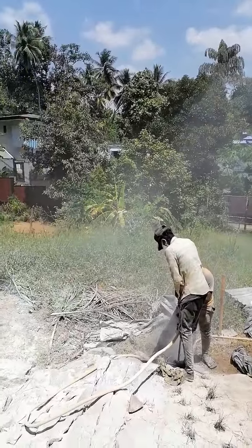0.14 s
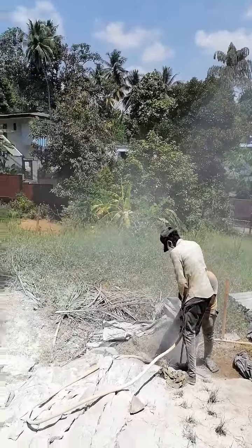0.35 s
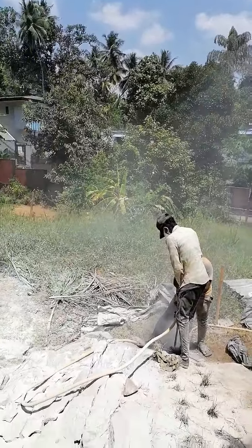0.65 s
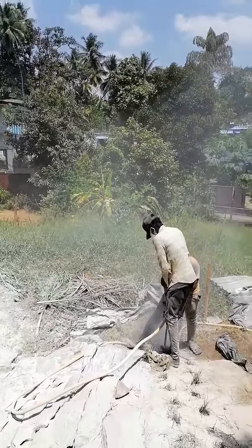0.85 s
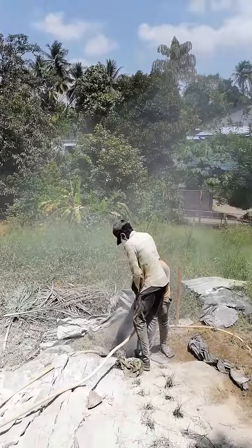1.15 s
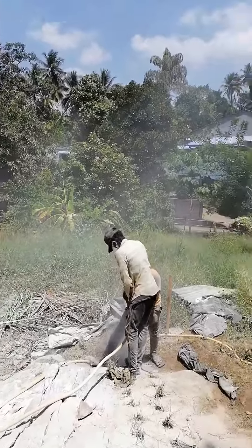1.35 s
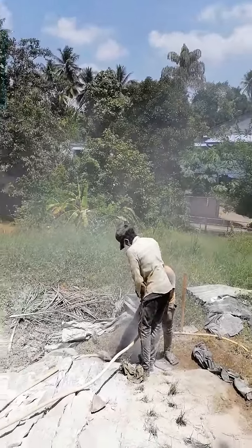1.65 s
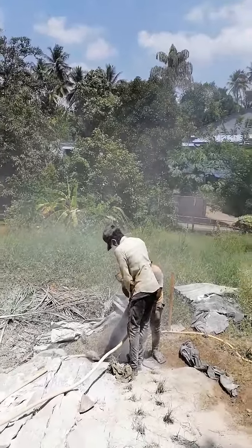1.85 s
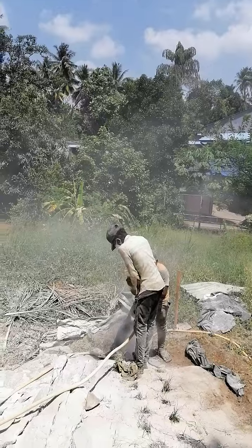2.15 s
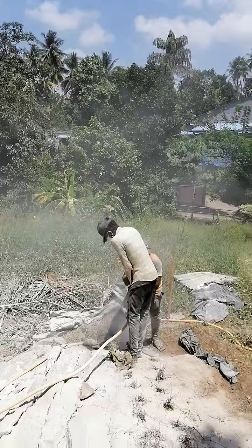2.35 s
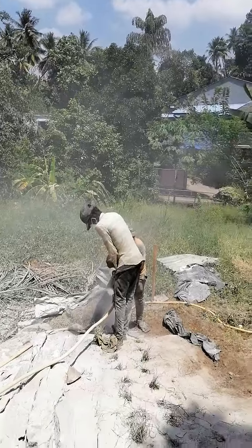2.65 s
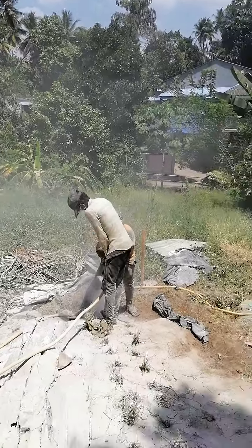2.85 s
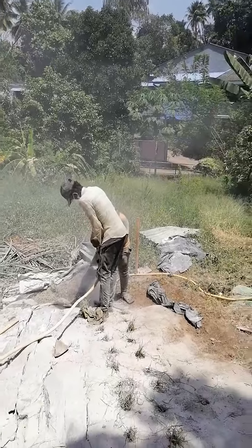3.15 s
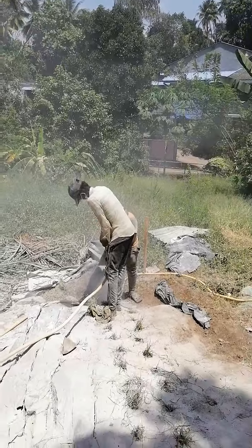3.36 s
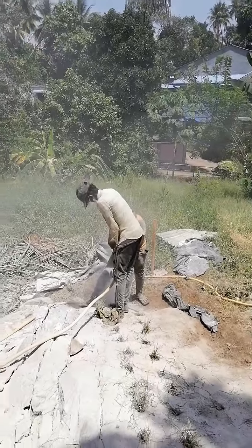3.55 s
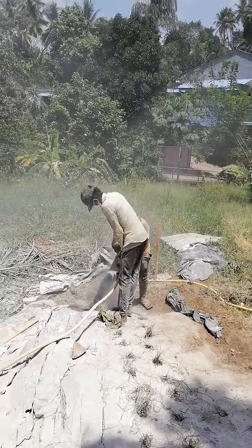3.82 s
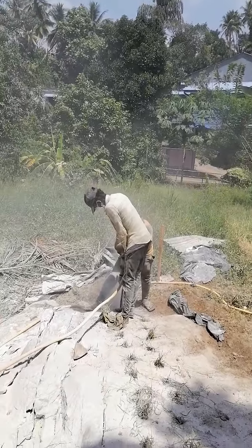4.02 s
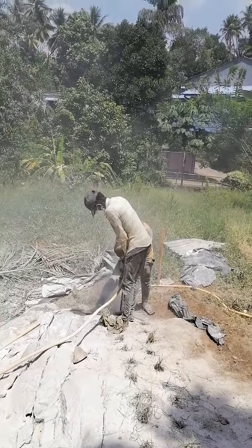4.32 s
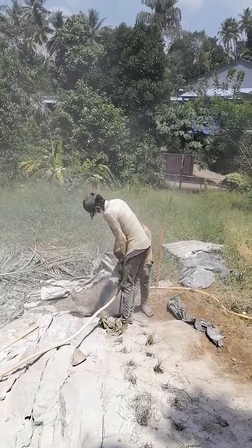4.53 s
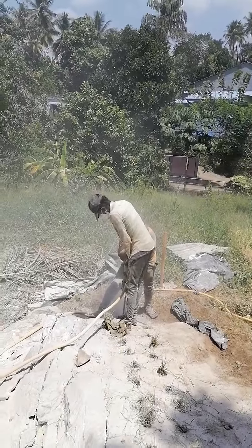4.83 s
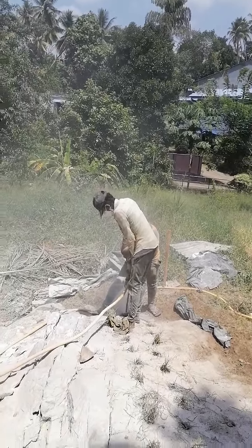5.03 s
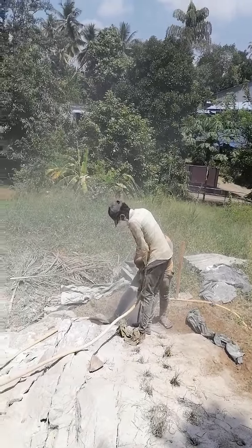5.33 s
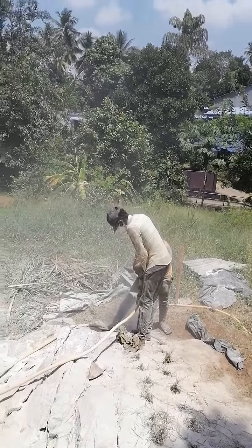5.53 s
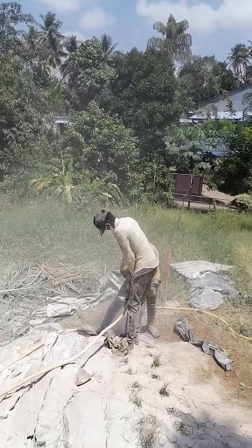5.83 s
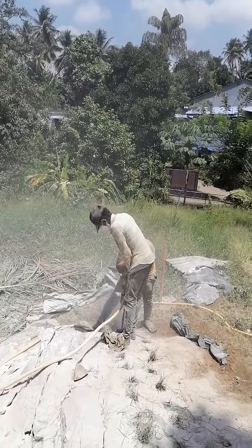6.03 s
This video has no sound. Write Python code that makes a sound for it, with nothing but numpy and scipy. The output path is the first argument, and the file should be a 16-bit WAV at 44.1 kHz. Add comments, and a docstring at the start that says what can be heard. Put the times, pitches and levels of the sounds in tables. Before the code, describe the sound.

A hand-held pneumatic rock drill is at full work from 0 seconds, a few metres from a stereo microphone outdoors. Its piston barks roughly thirty-five times per second, fusing into a coarse, throaty buzz with a low boom. Compressed air hisses constantly, spitting and surging within each cycle. Just after every bark, the blow makes the casing clatter and the drill steel chatter brightly in its hole, with uneven harder and softer hits. The hammering slows momentarily near 1.5, 2.2 and 2.7 seconds as the bit bites, recovering quickly each time. Between about 2 and 3 seconds the exhaust hum fades as the microphone turns, leaving a drier, rattlier tone. From 3 seconds the drill runs slightly faster and steadily, its metallic colour wavering. The sound leans right, with a very short scattered echo, and continues unbroken until just past 6 seconds.

```python
"""A hand-held pneumatic rock drill bores into bare rock a few metres away, outdoors.
From the start each piston cycle barks air from the exhaust: filtered pressure impulses trailed by jet noise.
Spent air hisses throughout; just after each bark a blow excites rod modes and bursts of contact noise.
The hammering slows briefly near 1.5, 2.2 and 2.7 s as the bit bites, then runs on faster.
From about 2 to 3 s the exhaust's hum fades as the stereo microphone turns; the drilling lasts to the end."""
import sys
import numpy as np
from scipy import signal
from scipy.fft import rfft, irfft, next_fast_len
from scipy.io import wavfile

SR = 44100
rng = np.random.default_rng(int(sys.argv[2]) if len(sys.argv) > 2 else 0)


def unload_wav(signal):
    """Save mono or channel-first audio to the path in sys.argv[1] as 16-bit WAV at rate SR, clipped to [-1, 1]."""
    wavfile.write(
        sys.argv[1],
        SR,
        np.round(np.clip(np.atleast_2d(signal).T, -1, 1) * 32767).astype(np.int16),
    )


N = 272538


def amp(db):
    """Level to amplitude ratio: 20 dB is a factor of ten."""
    return 10 ** (np.asarray(db) / 20)


def unit(x):
    """Normalization of signal power: scale to rms 1."""
    return x / np.sqrt(np.mean(x ** 2) + 1e-20)


def along(points, hz):
    """Interpolation of (f/Hz, value) points on a logarithmic frequency axis."""
    f, value = np.transpose(points)
    return np.interp(np.log(hz + 1), np.log(f + 1), value)


def curves(rows):
    """Linear interpolation in time: one value per sample for each column after t/s."""
    s, *columns = np.transpose(rows)
    return [np.interp(np.arange(N) / SR, s, column) for column in columns]


def wobble(rate):
    """Low-frequency random modulation: normal random knots, rate per second, joined by lines."""
    knots = rng.standard_normal(int(N * rate / SR) + 2)
    return np.interp(np.arange(N) * rate / SR, np.arange(len(knots)), knots)


def filtered(x, response):
    """Convolution theorem: the spectrum of x times a complex response of frequency."""
    size = 2 * next_fast_len(N // 2 + SR // 4)
    hz = np.fft.rfftfreq(size, 1 / SR)
    return irfft(rfft(x, size) * response(hz), size)[..., :N]


def causal(gain):
    """Minimum phase: folding the cepstrum gives a response that rings only after its cause."""
    cepstrum = irfft(np.log(gain))
    half = len(cepstrum) // 2
    cepstrum[1:half] *= 2
    cepstrum[half + 1:] = 0
    return np.exp(rfft(cepstrum))


def strokes(times, scatter_db, jitter, strength_db=0):
    """Impulse train: one impulse per stroke, with random size (dB) and timing (s)."""
    size, slip = rng.standard_normal((len(times), 2)).T
    at = np.round((times + jitter * slip) * SR).astype(int)
    inside = (at >= 0) & (at < N)
    strength = amp(strength_db + scatter_db * size)
    return np.bincount(at[inside], strength[inside], N)


def bursts(hits, rise, hold, fade, held):
    """Power superposition: each hit swells, holds and decays (s); held is steady power against their mean."""
    t = np.arange(SR // 10) / SR
    shape = (1 - np.exp(-t / rise)) * np.exp(-np.maximum(t - hold, 0) / fade)
    power = np.abs(signal.oaconvolve(hits ** 2, shape ** 2)[:N])
    return unit(np.sqrt(power / power.mean() + held))


# level difference between the two ports: f/Hz, left minus right level/dB
PORT_LEVEL_DIFFERENCE = [(60, -5), (130, -7), (260, -11), (420, -6), (700, -6.5), (1150, -3.5), (1450, 2.5),
                         (1750, -3), (2000, -1), (2900, -10), (4000, -3), (5000, -8), (6200, -7.5),
                         (7300, -2.5), (10000, 1), (14000, -3.5)]


def lean(hz):
    """Interaural level difference: the drill is louder in the right port in most bands."""
    return amp(np.array([[1], [-1]]) * along(PORT_LEVEL_DIFFERENCE, hz) / 2)


# coherence of the noise at the two ports: f/Hz, correlation/1
PORT_CORRELATION = [(30, -0.21), (90, 0.17), (800, 0.46), (1400, 0.46), (3500, 0.7), (5400, -0.024),
                    (6500, 0.065), (12000, -0.097)]


def rush(spectrum, envelope):
    """Partial coherence: noise whose ports agree best near 3.5 kHz, little in deep bass and above 5 kHz."""
    size = next_fast_len(N, True)
    hz = np.fft.rfftfreq(size, 1 / SR)
    turn = np.arccos(np.clip(along(PORT_CORRELATION, hz), -1, 1)) / 2
    response = amp(along(spectrum, hz)) * np.array([np.cos(turn), np.sin(turn)])
    mid, side = rfft(rng.standard_normal((2, N)) * envelope, size) * response
    pair = np.array([mid + side, mid - side])
    return unit(irfft(pair * lean(hz), size)[:, :N])


# bearing of the microphone: t/s, lag of the left port/s, turn/1
MICROPHONE_BEARING = [(0, 0.00014, 0.37), (2.3, 0.00016, 0.65), (3.1, 0.00011, 0.82), (6.18, 0.00011, 0.8)]


def late_left(pair):
    """Interaural time difference: the left port hears later by a lag that changes with bearing."""
    n = np.arange(N)
    lag_s = curves(MICROPHONE_BEARING)[0]
    return np.array([np.interp(n - lag_s * SR, n, pair[0]), pair[1]])


def ground(x, far_hz=2050, near_hz=1400, width_hz=380, depth_db=-14.5):
    """Interference: the bounce off the rock weakens one band, crossfaded downward as the microphone turns."""
    def notch(centre_hz):
        return filtered(x, lambda hz: causal(amp(depth_db / (1 + (2 * (hz - centre_hz) / width_hz) ** 2))))
    turned = curves(MICROPHONE_BEARING)[1]
    return (1 - turned) * notch(far_hz) + turned * notch(near_hz)


# common working level of the drill: t/s, level/dB
DRIVE_LEVEL = [(0, -36.5), (0.7, -37.5), (1.8, -38.5), (2.15, -35), (2.8, -38), (3.3, -36), (4.8, -36.5),
               (5.7, -38.5), (6.18, -37)]
FEED_DB, FEED_PER_S = 0.18, 7.6  # scatter and knot rate of the hand-held feed pressure


def drive():
    """Amplitude modulation: working effort in dB, wavering with the feed pressure."""
    return curves(DRIVE_LEVEL)[0] + FEED_DB * wobble(FEED_PER_S)


# piston speed, which dips while the bit bites: t/s, blow rate f/Hz
PISTON_SPEED = [(0.0, 32.24), (0.09, 36.9), (0.53, 35.26), (0.58, 36.93), (0.9, 35.11), (1.43, 35.18),
                (1.51, 31.11), (1.57, 34.54), (2.12, 34.24), (2.22, 31.46), (2.31, 36.17), (2.66, 31.33),
                (2.89, 35.72), (3.25, 37.02), (4.51, 35.79), (4.62, 37.56), (4.73, 35.75), (6.18, 36.16)]
# timing scatter: at top speed (s), added per Hz of speed lost (s), and slow drift (s)
UNEVEN_S, LABOUR_S_PER_HZ, DRIFT_S = .00015, .0001, .0003


def piston():
    """Phase integration: the port opens at each whole cycle, less evenly the slower the piston."""
    speed, t = curves(PISTON_SPEED)[0], np.arange(N) / SR
    cycles = np.cumsum(speed) / SR
    times = np.interp(np.arange(int(cycles[-1]) + 1), cycles, t)
    uneven = UNEVEN_S + LABOUR_S_PER_HZ * (speed.max() - np.interp(times, t, speed))
    drift = DRIFT_S * np.interp(times, t, wobble(8))
    return times - .0003 + drift + uneven * rng.standard_normal(len(times))


def scatter(x, t60=0.067, lowest_hz=420):
    """Diffuse reflection: rubble, bushes and walls return a short echo; long waves pass them by."""
    t = np.arange(SR // 5) / SR
    tail = rng.standard_normal(len(t)) * amp(-60 * t / t60) * (1 - np.exp(-t / 0.0021))
    tail = signal.sosfilt(signal.butter(2, lowest_hz, "high", fs=SR, output="sos"), tail)
    return signal.oaconvolve(x, tail / np.linalg.norm(tail))[:N]


# booms and hollows of the exhaust over the rock: centre f/Hz, width/Hz, level/dB
EXHAUST_BOOMS = [(71.7, 25, 10.5), (150.8, 29, 10), (282, 23, 5), (317.4, 18.5, -10.5), (385.5, 66, 8),
                 (420, 24, -8), (511, 68, 7.5), (546, 11, -14), (618, 17, -9.5), (675, 17, 0),
                 (722, 38, -5.5), (840, 29, 5.5)]


def booms(hz):
    """Resonance: peaks and dips of gain that colour the puffs and jet of the exhaust."""
    return amp(sum(db / (1 + (2 * (hz - centre) / width) ** 2) for centre, width, db in EXHAUST_BOOMS))


# level of the exhaust's hum: t/s, level/dB
HUM_LEVEL = [(0, -5), (0.9, -1), (1.3, 0), (2.0, 0.5), (2.55, -2), (2.9, -14), (6.18, -14)]


def hum(x, centre_hz=263, width_hz=17):
    """Narrow-band resonance: a low boom of the exhaust rings on more fully until the microphone turns."""
    ringing = signal.lfilter(*signal.iirpeak(centre_hz, centre_hz / width_hz, SR), x)
    return x + amp(curves(HUM_LEVEL)[0]) * ringing


# power stroke, its rebound, return stroke, port snapping shut, last rebound:
# t/s after the port opens, level/dB, half the low-pass corner f/Hz, push +1 or suck -1
AIR_PUFFS = [(0, 2, 3000, 1), (.0043, -5.5, 420, 1), (.0086, -2, 690, 1), (.0095, -11, 1000, -1),
             (0.0116, -9.5, 300, 1)]
# colour of the puffs: f/Hz, level/dB
PORT_SPECTRUM = [(30, -53), (48, -13), (66, -4), (110, 0), (200, 1.6), (280, 4.5), (335, -3), (490, -4),
                 (750, -7), (1100, -5), (1500, -5), (3000, -10.5), (6000, -18.5), (10000, -37)]
# colour of the turbulent jet: f/Hz, level/dB
JET_SPECTRUM = [(30, -34), (55, -27), (90, -2), (150, -2.5), (250, 3), (320, -15.5), (480, -3), (700, 1),
                (1000, -1), (1600, 2), (4000, -36), (12000, -38)]
# jet against puffs: t/s, level/dB
JET_BALANCE = [(0, -10), (1.2, -3), (2.2, -3.5), (2.8, -6.5), (3.3, -8.5), (6.18, -3.5)]
# exhaust against the drive: t/s, level/dB
EXHAUST_LEVEL = [(0, -1.7), (1, 0), (1.8, 0), (2.3, -1), (3, 1.7), (3.5, -0.1), (4.8, 0.2), (6.18, 0)]


def exhaust(times, drive_db):
    """Monopole radiation: steep pressure puffs and their echo, trailed by a turbulent jet."""
    puffs = 0
    for delay, db, half_corner_hz, push in AIR_PUFFS:
        hits = push * strokes(times + delay, scatter_db=0.8, jitter=.00006)
        keep = np.exp(-2 * np.pi * 2 * half_corner_hz / SR)
        # two equal one-pole low-passes round each impulse
        puff = signal.lfilter([(1 - keep) ** 2], [1, -2 * keep, keep ** 2], hits)
        puffs = puffs + amp(db) * puff
    puffs = puffs + amp(-8.0) * scatter(puffs)
    bark = unit(filtered(puffs, lambda hz: causal(amp(along(PORT_SPECTRUM, hz)) * booms(hz)) * lean(hz)))
    jet_hits = strokes(times, scatter_db=0.9, jitter=.0002)
    jet = rush(JET_SPECTRUM, bursts(jet_hits, rise=0.004, hold=0.011, fade=0.008, held=0.22))
    jet = unit(filtered(jet, lambda hz: causal(booms(hz))))
    voice = hum(bark + amp(curves(JET_BALANCE)[0]) * jet)
    return amp(drive_db + curves(EXHAUST_LEVEL)[0]) * voice


# colour of the hiss: f/Hz, level/dB
HISS_SPECTRUM = [(25, -35), (60, -11), (200, 4), (1000, -10), (1500, -8.5), (3000, -4.5), (4000, -3),
                 (5500, -2.5), (7300, 5), (9000, -4), (12000, -9.5), (15000, -10)]
SURGE_S = 0.013  # the second hiss surge of each cycle comes this long after the port opens


def spent_air(times):
    """Turbulence noise: air always hisses, spits as the port opens and surges again later in the cycle."""
    spit_hits = strokes(times + .0009, scatter_db=1.2, jitter=.0002)
    spit = bursts(spit_hits, rise=0.0005, hold=0.0025, fade=0.0065, held=0.9)
    surge_hits = strokes(times + SURGE_S, scatter_db=1.2, jitter=.0005)
    surge = bursts(surge_hits, rise=0.0015, hold=0.003, fade=0.007, held=1.2)
    flutter = amp(1.6 * wobble(7.9) + 1.8 * wobble(150))
    return amp(-36.0) * rush(HISS_SPECTRUM, np.hypot(spit, amp(4.0) * surge) * flutter)


# blows that stand out, as the bit cracks on sound rock or lands softly in dust: t/s, level/dB
STANDOUT_BLOWS = [(0.178, 1.8), (0.39, 2.3), (0.67, -2.2), (0.982, 3), (1.03, -2.2), (1.06, -3.3),
                  (1.35, -3.6), (1.465, 1.8), (1.64, 1.8), (1.9, -4.5), (2.32, -3.6), (2.345, -2.5),
                  (2.679, 1.8), (3.07, -2.5), (3.4, -2.4), (3.46, 2.6), (3.59, -2.3), (3.86, -3.6),
                  (4.337, 1.4), (4.45, 2.4), (4.56, 2.1), (4.83, 2.4), (4.977, 3), (5.308, 1.3), (5.5, 2.8),
                  (5.645, 3.2), (6.03, -2.8)]
# landing after the port opens, and its scatter in time and strength
LANDING_S, LANDING_SCATTER_S, BLOW_SCATTER_DB = .0018, .0003, .55


def hammer(times):
    """Impact excitation: the piston lands just after the port opens, now and then harder or softer."""
    landings = times + LANDING_S
    odd_db = 0
    for s, db in STANDOUT_BLOWS:
        distance = np.abs(landings - s)
        odd_db = odd_db + db * (distance == distance.min())  # only the nearest blow
    return strokes(landings, scatter_db=BLOW_SCATTER_DB, jitter=LANDING_SCATTER_S, strength_db=odd_db)


# bending modes of the drill steel: f/Hz, width/Hz of each of two cascaded resonators,
# level/dB, left minus right level/dB
STEEL_MODES = [(2140, 140, -21.5, 3), (2889, 130, -12.5, -9), (3272, 130, -13.8, -2), (3630, 140, -14, 0),
               (4544, 150, -13.5, -5), (4855, 240, -6, -11.5), (5422, 185, 0.5, -7.5),
               (6446, 125, -3, -8.5), (7472, 105, 2.2, 4.5), (8608, 100, -6, -5), (9783, 100, -5.8, -8),
               (11005, 85, -14, -12.5), (12340, 90, -18, -8), (13620, 90, -17.5, -8), (14975, 90, -15, -1)]
# ringing against the drive: t/s, then level/dB of the modes under 4 kHz, those near 5 kHz,
# the 6.4 kHz mode, the 7.5 kHz mode and the modes above
RINGING_LEVELS = [(0, -2.5, -4.5, 0.5, -9, -8), (1.1, -1.5, -1, 5, -5, -8.5), (1.45, -2, 1.5, 7, -0.5, -11),
                  (2.1, -2, -5, 1.5, -5.5, -7.5), (2.8, -0.5, 1.5, 2, -6, -6.5),
                  (3.05, 1.5, -2, 2, -8, -7.5), (3.45, 2, 1, -9, -10, -11.5),
                  (4.5, -0.5, 0, -25, -9, -10.5), (5.1, -0.5, 0.5, -7, -5.5, -8.5),
                  (6.18, 1, 2.5, 3, -12, -6)]
# borders between those groups of modes: f/Hz
MODE_GROUP_EDGES = [4000, 6000, 7000, 8000]
SCRAPE = .9  # steady scraping that keeps the high modes alive, against the blows
ROD_DIRECT, ROD_LAG_S = .55, .00009  # power share common to both ports, and its lag at the left one


def steel(blows, drive_db):
    """Modal resonance: after each blow the rod rattles in chuck and hole, feeding its bending modes."""
    direct = rng.standard_normal(N)
    both_ports = np.array([np.roll(direct, round(ROD_LAG_S * SR)), direct])
    contact = np.sqrt(ROD_DIRECT) * both_ports + np.sqrt(1 - ROD_DIRECT) * rng.standard_normal((2, N))
    struck = contact * bursts(blows, rise=0.0019, hold=0.0038, fade=0.013, held=0.066)
    ringing_db = curves(RINGING_LEVELS)
    out = 0
    for mode_hz, width_hz, db, lean_db in STEEL_MODES:
        high = np.clip((mode_hz - 5400) / 2000, 0, 1)
        force = struck + SCRAPE * high * contact
        mode = np.concatenate(signal.iirpeak(mode_hz, mode_hz / width_hz, SR))
        ring = unit(signal.sosfilt([mode, mode], force))
        turning_db = 2.64 * wobble(9)  # the rod turns, so the level of each mode wavers
        group_db = ringing_db[np.searchsorted(MODE_GROUP_EDGES, mode_hz)]
        ports = amp([[lean_db / 2], [-lean_db / 2]])
        out = out + ring * amp(db + drive_db + group_db + turning_db) * ports
    return amp(-0.03) * out


# colour of the chatter: f/Hz, spectral density level/dB
CHATTER_SPECTRUM = [(3000, -33), (3950, -36), (4350, -7.5), (4750, -5.5), (5400, 2.5), (6000, 1.5),
                    (6800, -1.5), (7350, 0), (7800, -9.5), (9400, -14.5), (10500, -23.5), (13000, -32),
                    (15000, -29)]
CHATTER_DB = 5  # against the drive


def chatter(blows, grit, drive_db):
    """Contact noise: the steel chatters in its hole after each blow."""
    envelope = grit * bursts(blows, rise=0.00096, hold=0.0058, fade=0.016, held=0.19)
    return amp(drive_db + CHATTER_DB) * rush(CHATTER_SPECTRUM, envelope)


# colour of the casing's clatter: f/Hz, spectral density level/dB
CASING_SPECTRUM = [(500, -15), (900, -8), (1500, -3.5), (2100, -3.5), (2900, -1.5), (3550, -2),
                   (3950, -17.5), (5000, -26.5)]
CASING_DB, CASING_TURN_DB = -3.5, 0.5  # against the drive, and gain per unit of microphone turn


def casing(blows, grit, drive_db):
    """Structure-borne sound: each blow makes the casing clatter, at a wavering level."""
    turned = curves(MICROPHONE_BEARING)[1]
    level_db = drive_db + CASING_DB + CASING_TURN_DB * turned + 1.3 * wobble(6)
    envelope = grit * bursts(blows, rise=0.0008, hold=0.0065, fade=0.0095, held=0.32)
    return amp(level_db) * rush(CASING_SPECTRUM, envelope)


def scene():
    """Superposition: exhaust, steel, chatter and casing follow one drive; spent air hisses over them."""
    drive_db = drive()
    times = piston()
    bark = exhaust(times, drive_db)
    air = spent_air(times)
    blows = hammer(times)
    grit = amp(1.6 * wobble(700))  # many small contacts within each blow
    ring = steel(blows, drive_db)
    rattle = chatter(blows, grit, drive_db)
    clatter = casing(blows, grit, drive_db)
    return late_left(ground(bark + clatter)) + ring + rattle + ground(air)


TOP_HZ = 15300


def record(dry):
    """Band limitation: nothing at or above the top frequency passes."""
    return filtered(dry, lambda hz: hz < TOP_HZ)


dry = scene()
out = record(dry)
unload_wav(out)
```